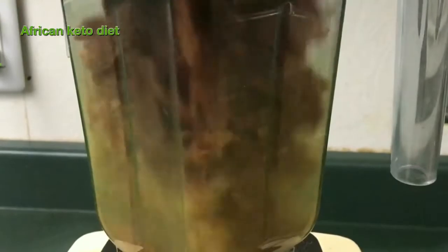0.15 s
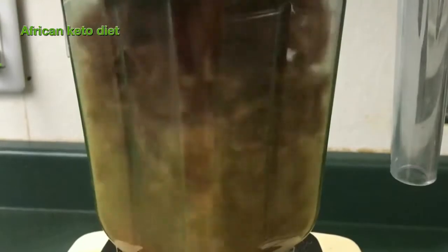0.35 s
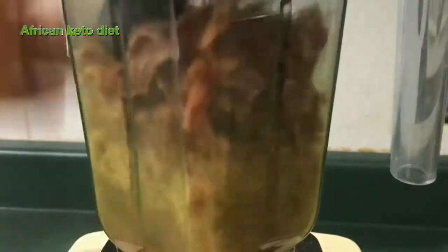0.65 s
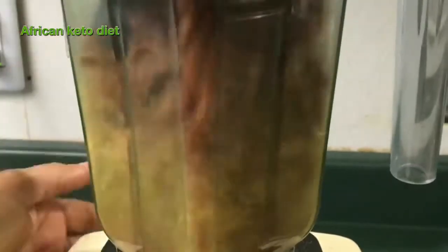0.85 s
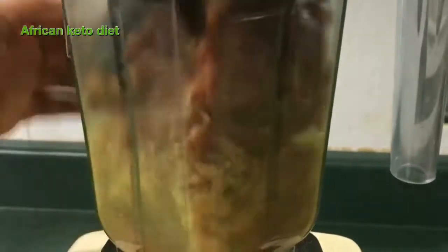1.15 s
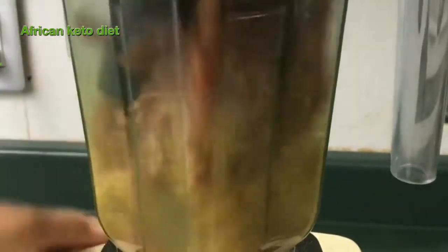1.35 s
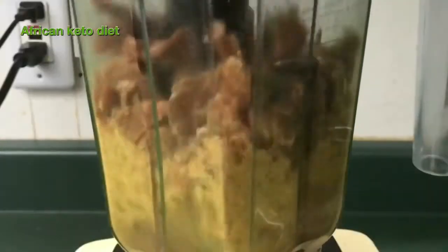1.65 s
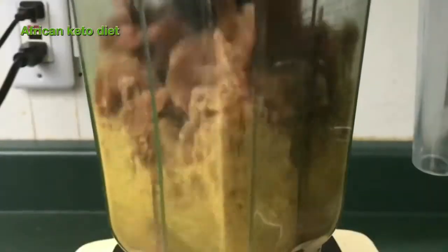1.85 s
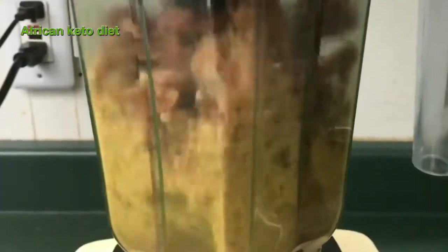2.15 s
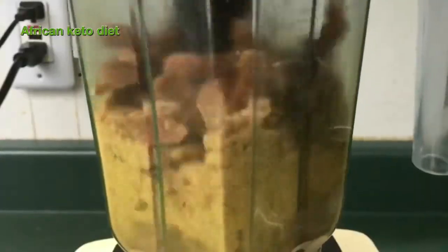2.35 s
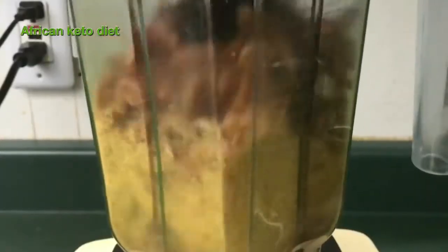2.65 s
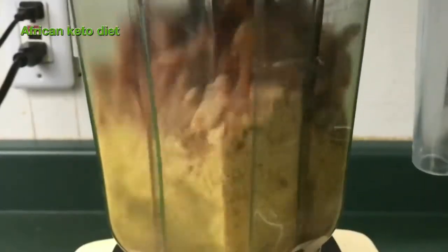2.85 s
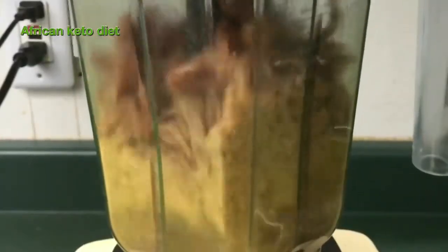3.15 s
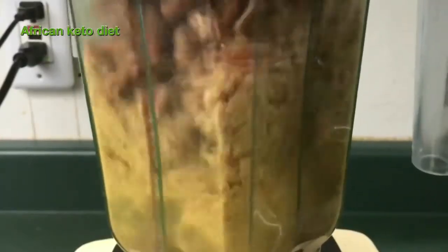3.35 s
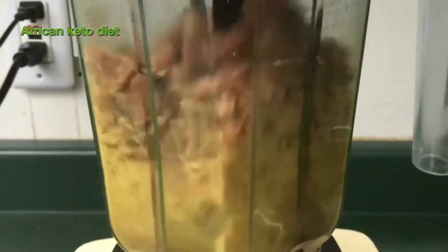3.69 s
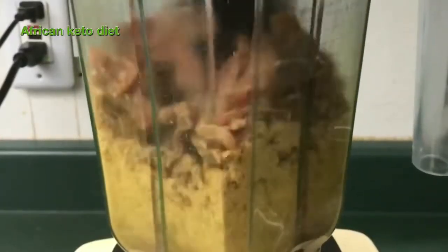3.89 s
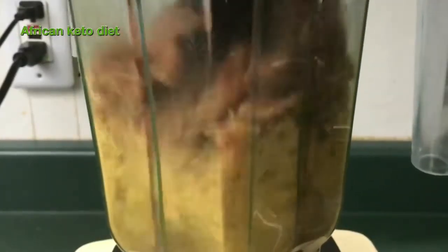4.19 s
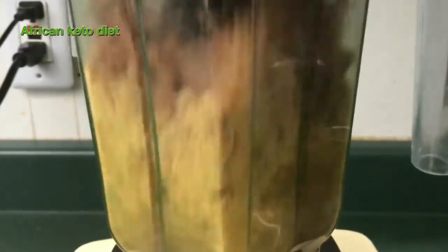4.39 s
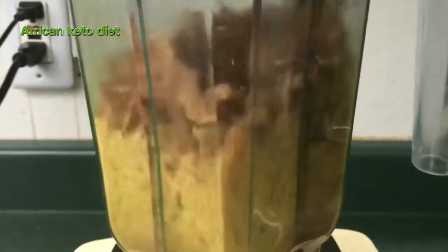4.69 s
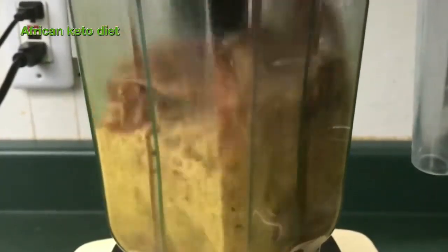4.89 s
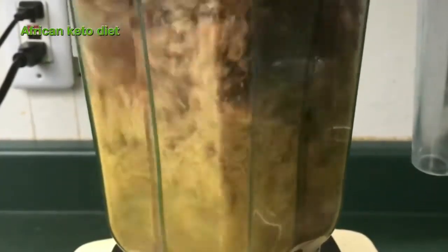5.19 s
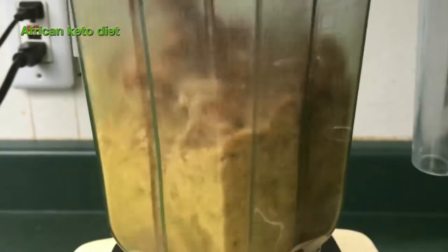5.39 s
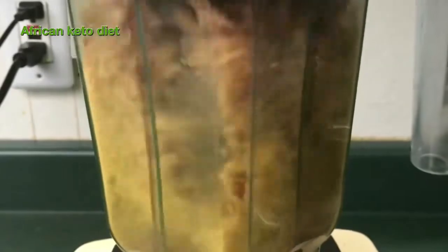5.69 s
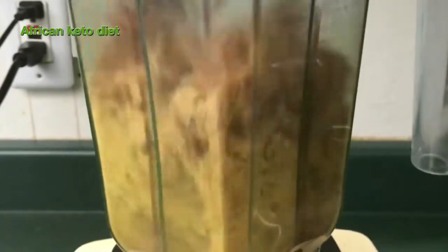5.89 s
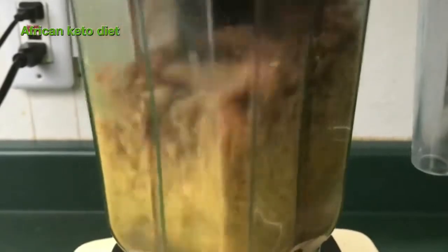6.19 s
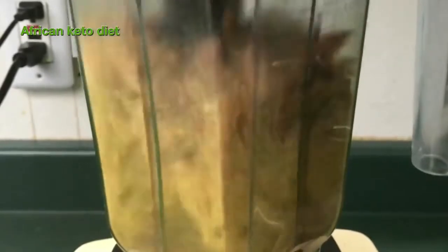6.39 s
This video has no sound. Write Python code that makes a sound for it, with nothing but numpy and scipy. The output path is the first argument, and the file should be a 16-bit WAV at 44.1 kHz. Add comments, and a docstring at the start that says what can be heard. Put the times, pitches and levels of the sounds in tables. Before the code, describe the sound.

A blender harshly chops dried chunks, rattling and knocking its plastic jar with distortion, then abruptly drops much quieter to a finer gritty grind.

```python
"""In a kitchen, a blender chops dried chunks close to a phone microphone.
The blades fling chunks and grit against the plastic jar, whose wall rings in short modes made by resonators
driven with noise bursts; the motor base shakes below it and the motor's fan rushes behind, as shaped noise.
The phone overloads on the knocks. After a second and a half the volume fades out, then comes back much lower.
From then on the jar sounds of finer meal."""
import sys
import numpy as np
from scipy import signal
from scipy.fft import rfft, irfft
from scipy.io import wavfile
from scipy.ndimage import uniform_filter1d

SR = 44100
rng = np.random.default_rng(int(sys.argv[2]) if len(sys.argv) > 2 else 0)


def unload_audio(sound):
    """Save the sound as a 16-bit wav file, at the path given as the first command line argument."""
    columns = np.transpose(np.atleast_2d(sound))
    # keep every value between -1 and 1, then stretch to whole-number steps
    steps = np.round(np.clip(columns, -1, 1) * 32767)
    wavfile.write(sys.argv[1], SR, steps.astype(np.int16))


N = 288414
TIME = np.arange(N) / SR
FINE_FROM_S = 1.555  # coarse chunks before, finer meal after
LOW_HZ, BODY_HZ, TREBLE_HZ = 450, 950, 5500  # band edges: base | deepest wall mode | wall body | treble

# Chunks that knock the jar wall, close to the microphone; levels as heard, before the trims of the three bands:
# (time [s], peak level [dB], wall boom relative to it [dB], crack relative to it [dB])
CHUNK_KNOCKS = [(0.106, 6, -15, -7), (0.158, 13, -15, -13), (0.256, -3, -23, -9), (0.346, 5.5, -15.5, -14),
                (0.387, -1.5, -12.5, -16), (0.427, 9, -33, -19), (0.476, 4, -13, -19), (0.508, 1, -12, -13),
                (0.55, 15, -19, -17), (0.605, 8, -20, -13.5), (0.641, 0.5, -9, -14), (0.696, 0, -31, -12),
                (0.728, -7, -10, -16), (0.773, -3, -12, -13), (0.806, 9.5, -16.5, -13),
                (0.873, -10, -24, -10), (0.891, 3, -20, -17), (0.934, -1, -25, -13),
                (1.009, 13, -11.5, -18), (1.079, 3, -16, -16), (1.102, -7, -11, -13), (1.117, 4, -21, -13),
                (1.142, -2, -10, -10), (1.215, 0, -20, -15), (1.24, 6, -16, -12), (1.322, -16, -18, -11),
                (1.366, 7.5, -25, -22), (1.389, 3, -22, -13), (1.437, 8.5, -17, -12), (1.509, -7, -30, -16),
                (1.582, -20, -13.5, -16), (1.614, -17, -16, -19), (1.696, -18, -30, -16),
                (1.821, -18, -15, -16), (1.886, -19, -22, -14), (1.954, -16, -31, -16),
                (2.003, -14, -17, -17.5), (2.028, -19, -20, -17), (2.131, -23, -9, -12),
                (2.187, -30, -6, -14), (2.365, -20.5, -11.5, -16), (2.399, -25, -14, -14),
                (2.595, -25, -9.5, -15), (2.638, -18, -16, -18), (2.685, -19, -22, -13),
                (2.72, -15, -14, -14), (2.891, -22, -17, -13), (2.906, -15.5, -17, -12),
                (2.994, -25, -26, -17), (3.049, -19, -23, -15), (3.114, -14.5, -24, -17),
                (3.144, -20, -20, -14), (3.23, -15.5, -23, -16), (3.342, -27, -14, -15),
                (3.406, -22, -16, -16), (3.436, -21, -19, -7), (3.488, -24, -17, -14),
                (3.504, -16, -12.5, -15), (3.541, -28, -20, -12), (3.641, -19, -19, -16),
                (3.672, -18, -24, -14), (3.699, -22, -14, -11), (3.855, -31, -29, -19),
                (3.911, -20, -28, -13), (4.062, -23, -24, -12), (4.08, -21, -19, -14),
                (4.134, -14, -11.5, -13.5), (4.22, -23, -19, -19), (4.253, -26, -6, -14),
                (4.298, -21, -22, -14), (4.439, -17, -15, -17), (4.478, -14, -13, -13),
                (4.554, -25, -5.5, -16), (4.642, -19, -12, -17), (4.687, -24, -23, -15),
                (4.702, -16.5, -10.5, -15), (4.788, -15.5, -7, -19), (4.943, -19, -19, -17),
                (4.962, -17, -21, -12), (5.021, -22, -23, -10), (5.055, -23, -28, -13),
                (5.15, -31.5, -3, -17), (5.206, -17, -11, -16), (5.276, -20, -18, -12),
                (5.344, -22, -19, -12), (5.467, -13, -19, -18), (5.599, -25, -29, -15),
                (5.725, -16, -9, -16), (5.773, -19, -8, -9), (5.843, -30, -20, -12), (5.886, -14, -13, -14),
                (6.036, -25.5, -10, -9), (6.201, -20, -21, -14), (6.326, -33, -10, -15),
                (6.452, -22, -24, -19), (6.498, -16, -19, -19)]


def knocks():
    """Chunks land as noisy bursts; heavy ones boom in the wall, brittle ones crack; cracks die before booms."""
    s, peak_db, boom_db, crack_db = np.transpose(CHUNK_KNOCKS)
    # levels are as heard, so undo the volume that record() applies
    peak_db = peak_db - curve(PLAYBACK_VOLUME, s)[0]
    after = np.arange(int(.1 * SR)) / SR
    rise = np.minimum(after / 0.0013, 1)
    t60_s = np.array([[0.0432], [0.048], [0.0264]])  # boom, body, crack
    fall_db = 60 * after / t60_s
    push = np.zeros((3, N + len(after)))
    for at, db, boom, crack in zip((s * SR).astype(int), peak_db, boom_db, crack_db):
        part_db = db + np.c_[[boom, 0, crack]]
        push[:, at:at + len(after)] += rise * undb(part_db - fall_db)

    noise = rng.standard_normal(N) * undb(1.5 * held(rate=500.))
    steady = jar(noise)  # reference level of each band
    edges = [(LOW_HZ, BODY_HZ), (BODY_HZ, TREBLE_HZ), (TREBLE_HZ, 18000)]
    boom, body, crack = [band(jar(p[:N] * noise), *e) / np.std(band(steady, *e)) for p, e in zip(push, edges)]
    return undb(2.5) * boom + undb(-11.0) * body + undb(1.0) * crack


# Modes of the jar wall, relative levels:
# (frequency [Hz], width [Hz], level with coarse chunks [dB], level with finer meal [dB])
JAR_MODES = [(680.4, 48, 5.5, 6), (1012, 105, 0.5, 0), (1413, 127, -1.5, -2.5), (1870, 173, 4.5, 3),
             (2267, 140, -5.5, -0.5), (2674, 144, 0, 0.5), (3313, 420, -10.5, -8.5), (4060, 750, 5.5, 5),
             (4510, 1130, -10.5, -13), (6180, 1300, -1.5, -1), (8560, 600, -5.5, -3.5)]


def jar(force):
    """The plastic wall answers a force with its short modes and the direct sound of the impact."""
    return ring(force, JAR_MODES)


# Direct sound of the impacts between the modes, relative: (frequency [Hz], density [dB per Hz])
DIRECT_SPECTRUM = [(18, -35), (45, -19), (110, -29.5), (330, -15), (900, -8), (2000, -3), (2950, -3.5),
                   (4200, 5.5), (7000, -10), (9500, -6.5), (16000, -7)]


def ring(force, modes, direct_db=-3., place_db=1.8):
    """A body rings in its modes and passes impacts on; where a piece lands decides which modes answer."""
    out = undb(direct_db) * colour(force, DIRECT_SPECTRUM)
    for k, (hz, width_hz, coarse_db, fine_db) in enumerate(modes):
        gain_db = by_meal(coarse_db, fine_db) + place_db * held(rate=90.)
        mode = signal.lfilter(*signal.iirpeak(hz, hz / width_hz, fs=SR), undb(gain_db) * force)
        out = out + (-1) ** k * mode  # neighbouring modes in opposite polarity
    return out


# Modes of the motor base on the counter, relative levels:
# (frequency [Hz], width [Hz], level with coarse chunks [dB], level with finer meal [dB])
BASE_MODES = [(145, 32, -10, -9), (252, 28, -3, -5)]
# Slow level of the low end, base and deepest wall mode, relative to the churn: (time [s], level [dB])
LOW_END_LEVEL = [(0, 0.5), (.7, -1.5), (1.3, 0.5), (1.6, 0), (2.2, -1), (3, -1.5), (3.8, -1), (4.4, 1.5),
                 (5.2, 1), (5.7, 2), (6.54, 1.5)]
# mean churn of grit, and the base relative to it (with coarse chunks [dB], with finer meal [dB])
CHURN_DB, BASE_DB = (-8.5, -14), (-13.5, -11.5)
BASE_SMOOTH_S, BASE_FOLLOW = 0.042, 1.49  # the heavy base follows a smoothed load, and more deeply


def grit():
    """Meal hisses, crumbs tick through it, splinters snap in the treble; the heavy base swells with the load."""
    load_db = load()
    churn_db = by_meal(*CHURN_DB)
    level_db = churn_db + load_db
    smooth_load_db = uniform_filter1d(load_db, size=int(BASE_SMOOTH_S * SR))
    base_db = churn_db + by_meal(*BASE_DB) + BASE_FOLLOW * smooth_load_db
    low, = undb(curve(LOW_END_LEVEL))

    meal = spray(rate=2500., spread_db=5.5, t60=0.0031)
    crumbs = spray(rate=310.0, spread_db=2.0, t60=0.016)
    rung = jar(meal + undb(-4.0) * crumbs)
    # the deepest wall mode follows the low-end level
    deepest = band(rung, LOW_HZ, BODY_HZ)
    wall = band(rung, LOW_HZ, TREBLE_HZ) + (undb(0.5) * low - 1) * deepest

    fine_snaps = spray(rate=4400.0, spread_db=6.5, t60=0.0054)
    splinters = spray(rate=170.0, spread_db=8.0, t60=0.0084)
    snap = fine_snaps + undb(-5.5) * splinters
    dust = band(colour(snap, DIRECT_SPECTRUM), TREBLE_HZ, 15500)

    shaking = spray(rate=990.0, spread_db=0.5, t60=0.013)
    base = band(ring(shaking, BASE_MODES, direct_db=-1.0, place_db=2.0), 41.0, LOW_HZ)

    wall = undb(level_db - 1.5) * unit(wall)
    # airborne dust keeps hissing through the lulls, so it follows the level less deeply
    dust = undb(0.76 * level_db - 11.0) * unit(dust)
    return wall + dust + undb(base_db) * low * unit(base)


def spray(rate, spread_db, t60):
    """Random impacts (rate per s), many small and few large, each a short noisy scrape."""
    hit = rng.random(N) < rate / SR
    size = undb(spread_db * np.minimum(rng.exponential(size=N), 4))
    return unit(decay(hit * size, t60) * rng.standard_normal(N))


# Lulls: food bridges over the blades, the churn sinks, then the heap drops back in:
# (end time [s], length [s], depth of load [dB])
CHURN_LULLS = [(.102, 0.036, 8.5), (.425, .035, 7.5), (0.698, 0.063, 6), (.871, 0.029, 6), (0.935, 0.07, 8),
               (1.102, 0.04, 7.5), (1.222, 0.022, 3), (1.437, 0.13, 7), (1.695, 0.034, 4),
               (1.827, 0.085, 2), (1.956, 0.083, 2.5), (2.151, 0.13, 4), (2.364, 0.028, 5),
               (2.398, 0.032, 6.5), (2.594, 0.11, 3), (2.903, 0.067, 4), (2.996, 0.053, 6.5),
               (3.182, .06, 3.5), (3.313, 0.052, 2), (3.407, 0.028, 6), (3.498, 0.091, 5), (3.702, 0.12, 4),
               (3.863, 0.064, 2.5), (3.912, 0.029, 2.5), (3.976, 0.023, 5.5), (4.075, 0.096, 3),
               (4.13, 0.055, 2.5), (4.25, 0.021, 4), (4.441, 0.061, 12), (4.637, 0.11, 5.5),
               (4.689, .03, 4), (4.94, 0.17, 4.5), (5.026, 0.024, 6), (5.207, 0.018, 2), (5.337, 0.12, 6),
               (5.466, .025, 3), (5.599, 0.086, 6), (5.845, 0.059, 13.5), (5.886, 0.047, 11),
               (6.329, 0.087, 5), (6.428, 0.069, 2), (6.494, 0.035, 5)]
SINK_SHARE = 0.54  # part of a lull spent sinking, the rest stays low
SURGE_SHARE, SURGE_T60_S = 0.18, 0.31  # overshoot after a lull, as a share of its depth
STIR_DB, STIR_PER_S = 1.1, 55.  # random unevenness of the churn


def load():
    """Load on the blades in dB: it sinks through each lull, snaps back with a surge and stirs at random."""
    db = STIR_DB * held(rate=STIR_PER_S)
    for end, length, depth_db in CHURN_LULLS:
        since = TIME - end
        sink = np.clip((since + length) / (length * SINK_SHARE), 0, 1) * (since < 0)
        surge = SURGE_SHARE * undb(-60 * np.abs(since) / SURGE_T60_S) * (since >= 0)
        db = db + depth_db * (surge - sink)
    return uniform_filter1d(db, size=32)


# Rush of the motor behind the jar, relative: (frequency [Hz], density [dB per Hz])
MOTOR_SPECTRUM = [(30, -56), (120, -2), (300, -3.5), (1500, 9), (5000, 5), (9000, -18.5), (15500, -15)]
MOTOR_DB = -32  # RMS level


def motor():
    """Cooling air and bearings: a smooth rush of coloured noise under the grinding."""
    return undb(MOTOR_DB) * unit(colour(rng.standard_normal(N), MOTOR_SPECTRUM))


def kitchen(x, t60=.15, wet_db=-20.):
    """Tiles and counter send back a short, dull wash: convolution with decaying, band-limited noise."""
    samples = int(.3 * SR)
    tail = rng.standard_normal(samples) * undb(-60 * TIME[:samples] / t60)
    tail = band(tail, 47.0, 6000.0)
    wash = signal.fftconvolve(x, tail / np.sqrt(np.sum(tail ** 2)))[:N]
    return x + undb(wet_db) * wash


def by_meal(coarse, fine):
    """A value for coarse chunks that switches to one for finer meal."""
    return np.where(TIME < FINE_FROM_S, coarse, fine)


def held(rate):
    """Random values held 1 / rate s, slightly slewed."""
    k = int(SR / rate)
    return uniform_filter1d(rng.standard_normal(N // k + 1).repeat(k)[:N], size=64)


def decay(x, t60):
    """Every impulse gets an exponential tail that falls 60 dB in t60 s."""
    return signal.lfilter([1], [1, -np.exp(-np.log(1000) / (t60 * SR))], x)


def colour(x, points, size=2048):
    """Causal filter with the given (Hz, dB) spectrum, built from the folded cepstrum of its log gain."""
    hz, db = np.transpose(points)
    grid_hz = np.arange(size + 1) * SR / size / 2
    log_gain = np.log(undb(np.interp(np.log(grid_hz + 1), np.log(hz), db)))
    cepstrum = irfft(log_gain)
    cepstrum[1:size] *= 2
    cepstrum[size + 1:] = 0
    impulse = irfft(np.exp(rfft(cepstrum)))[:size]
    return signal.fftconvolve(x, impulse)[:N]


def band(x, lo_hz, hi_hz):
    """Keep what lies between two frequencies."""
    return signal.sosfilt(signal.butter(2, [lo_hz, hi_hz], "bandpass", fs=SR, output="sos"), x)


def curve(rows, at=TIME):
    """Columns of a (time, value, ..) table joined by straight lines."""
    s, *columns = np.transpose(rows)
    return [np.interp(at, s, c) for c in columns]


def undb(db):
    """Amplitude factor of a level in dB."""
    return 10 ** (np.asarray(db) / 20)


def unit(x):
    """Scale to an RMS of 1."""
    return x / np.sqrt(np.mean(x ** 2))


def scene():
    """Grit, knocks and motor together in the kitchen, as one channel."""
    return kitchen(grit() + knocks() + motor())[None]


# Dip of the microphone port: (frequency [Hz], width [Hz], level [dB])
PORT_DIP = 10380, 1100, -3.5
# Playback volume, applied after the clipping: (time [s], level [dB])
PLAYBACK_VOLUME = [(0, 0), (1.518, 0), (1.545, -14), (1.5545, -14), (1.5555, -40), (1.562, -36),
                   (1.583, -20.5), (6.54, -20.5)]
TOP_HZ = 15750


def record(dry):
    """The port dips the treble, the phone clips the knocks, the volume is ridden afterwards, the top is cut."""
    hz, width_hz, dip_db = PORT_DIP
    around_dip = signal.lfilter(*signal.iirpeak(hz, hz / width_hz, fs=SR), dry)
    dry = dry - (1 - undb(dip_db)) * around_dip
    clipped = np.clip(dry, -.86, .86)
    ridden = clipped * undb(curve(PLAYBACK_VOLUME)[0])
    return signal.sosfilt(signal.ellip(12, .2, 75, TOP_HZ, fs=SR, output="sos"), ridden)


dry = scene()
out = record(dry)
unload_audio(out)
```